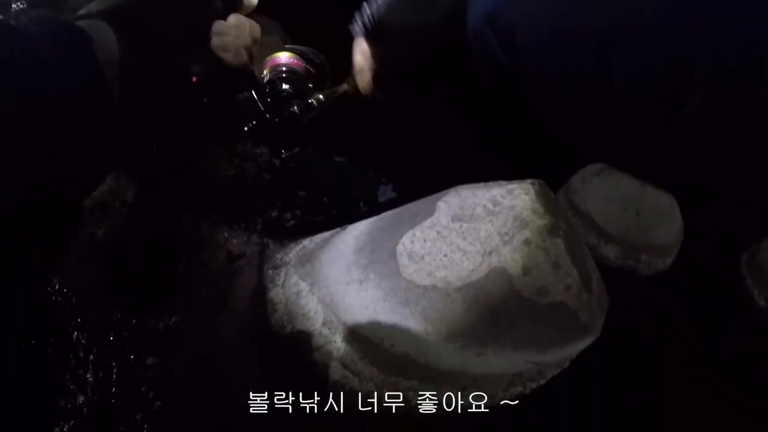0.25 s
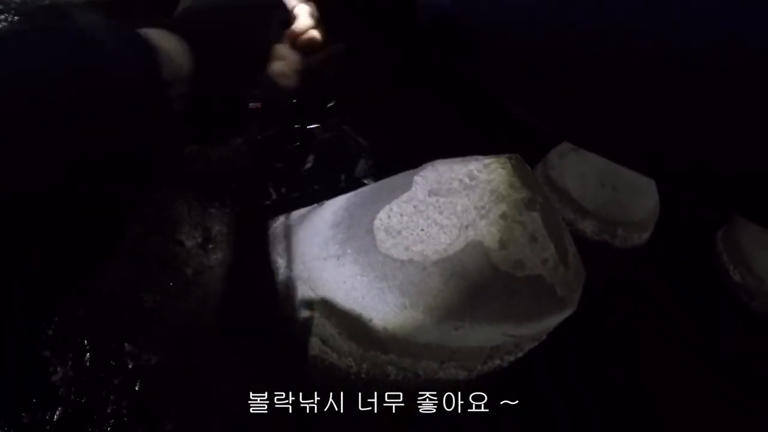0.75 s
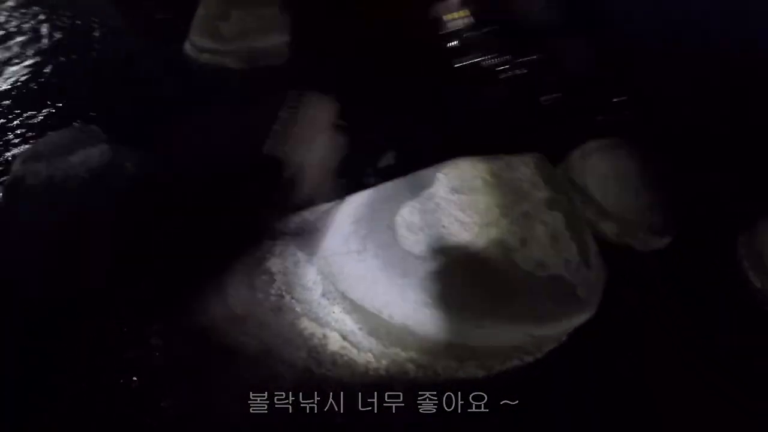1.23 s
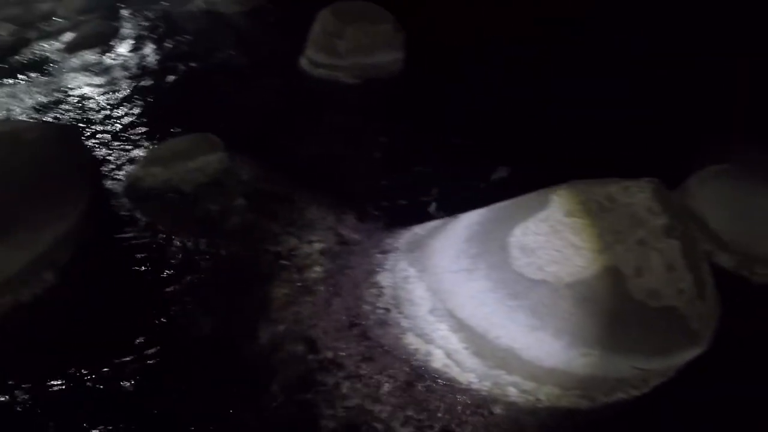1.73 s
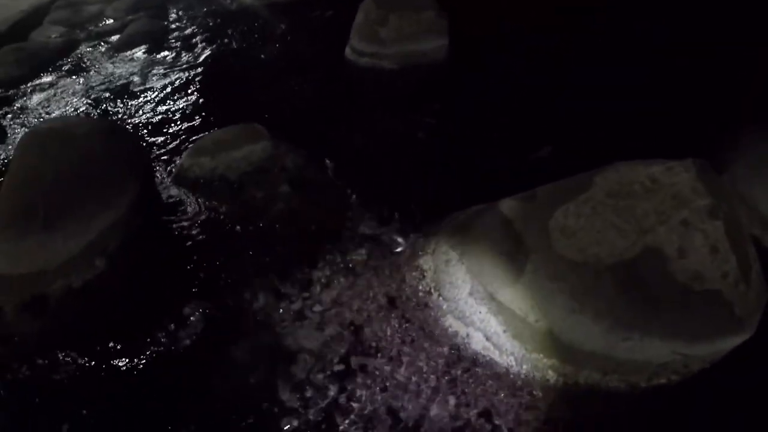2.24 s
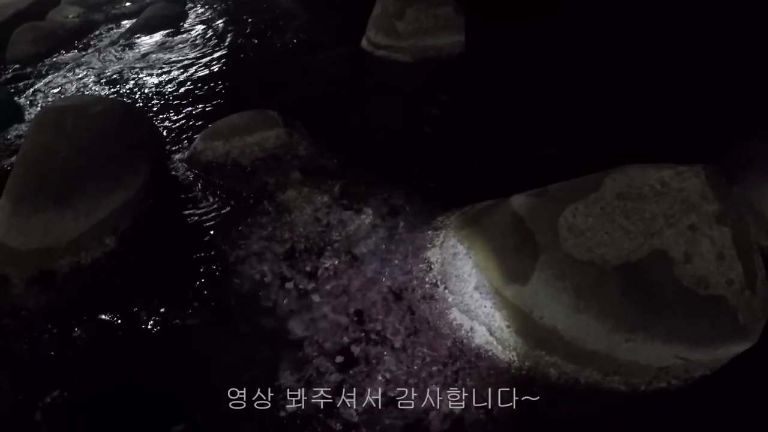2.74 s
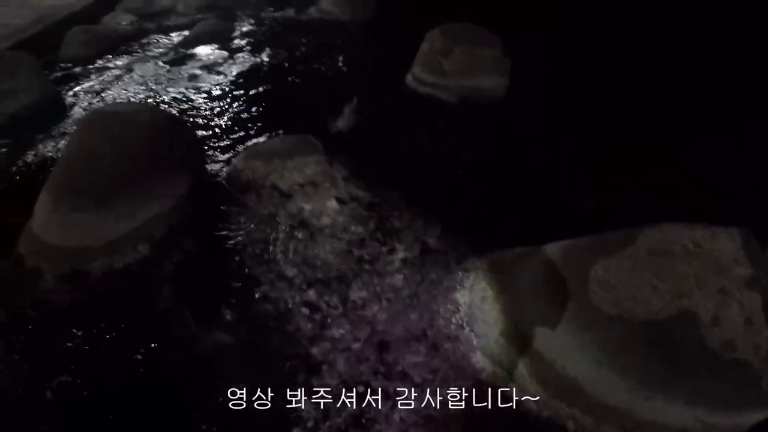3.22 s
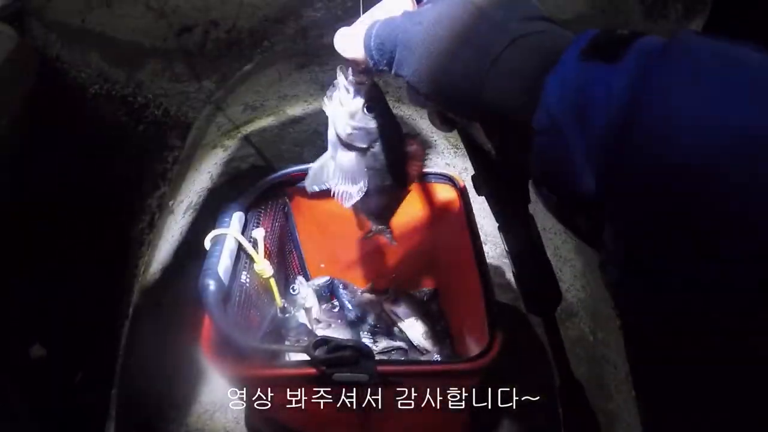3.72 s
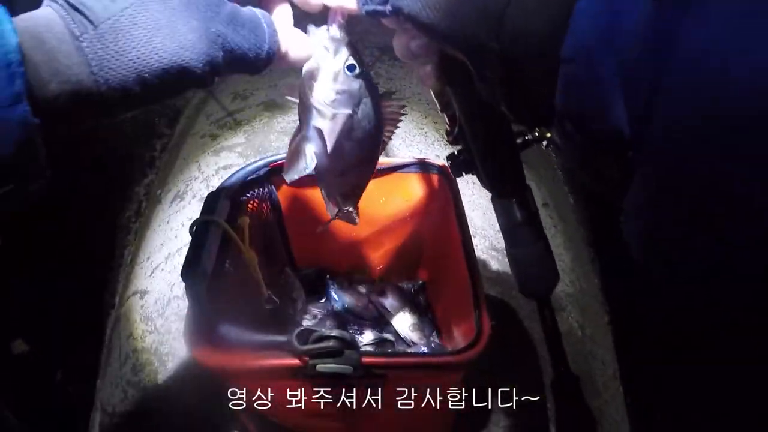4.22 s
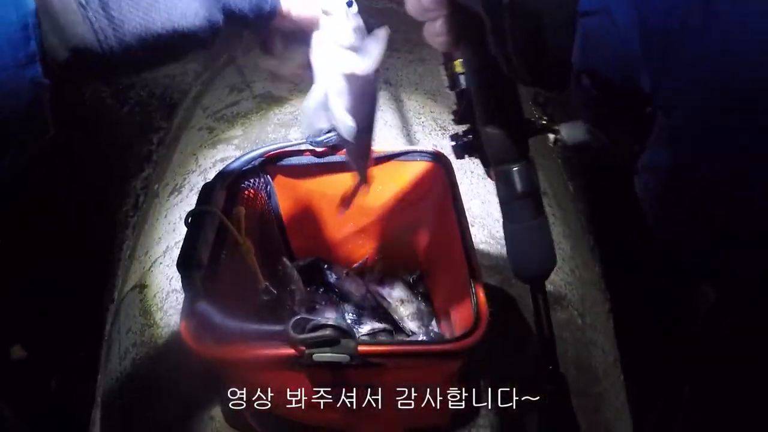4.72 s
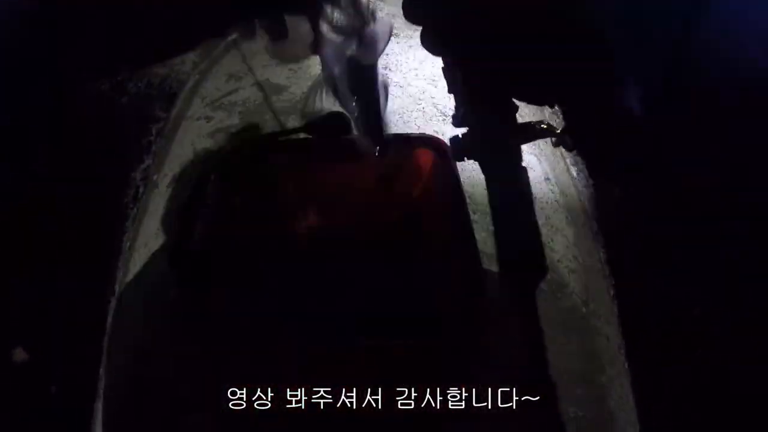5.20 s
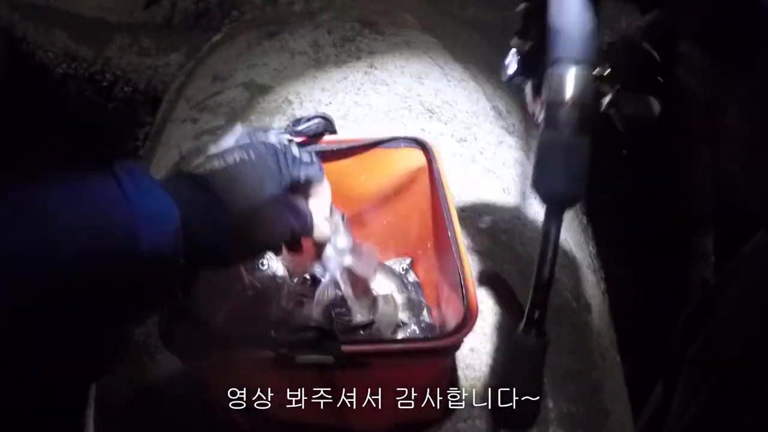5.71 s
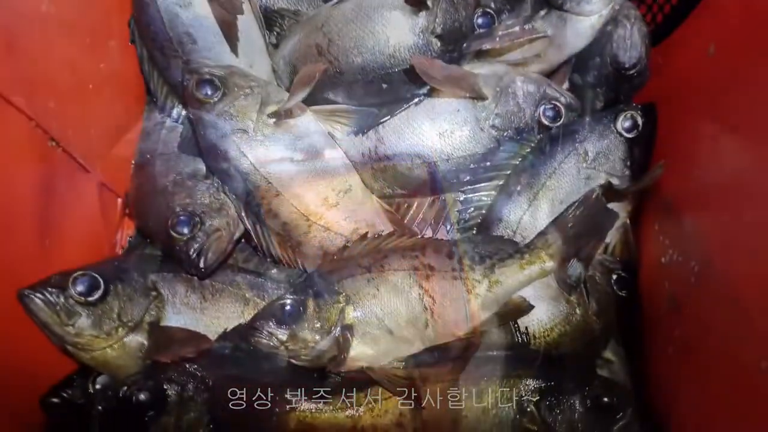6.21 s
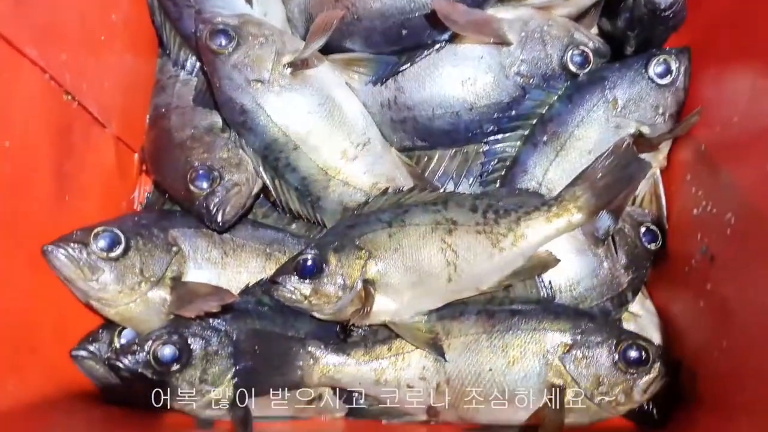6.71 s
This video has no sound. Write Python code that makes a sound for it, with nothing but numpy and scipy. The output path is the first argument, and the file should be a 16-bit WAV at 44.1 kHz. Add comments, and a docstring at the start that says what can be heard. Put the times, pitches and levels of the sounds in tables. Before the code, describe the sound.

Gear snaps and cloth rustle, wind swirls over hissing sea between rocks, then roars and overloads; brief silence, light breeze and dull bumps.

```python
"""A windy rocky shore at night, heard through the two microphone ports of a small camera, in three shots. First
shot: gear snaps and a rustle fades away, then wind swirls over the ports with its bass filtered off. Sea hisses
between the rocks, bubbles pop, a fishing reel ticks, water begins to trickle and the camera chirps faintly.
After a hard cut the wind roars in full and trips the limiter, water trickles and hard gear knocks. A silent
gap, then a calm spot: light breeze, rustling, dry snaps and bumps on the right port. Air is noise and gliding
tones; hard things are ringing modes."""
import sys
import numpy as np
from scipy import signal
from scipy.fft import rfft, irfft, next_fast_len
from scipy.io import wavfile

SR = 44100
rng = np.random.default_rng(int(sys.argv[2]) if len(sys.argv) > 2 else 0)


def materialize(psi):
    """Save the field psi as 16-bit PCM at rate SR to the path in sys.argv[1].

    A 1-D psi becomes a single channel; in a 2-D psi each row is a channel.
    """
    bounded = np.clip(np.atleast_2d(psi).T, -1, 1)
    quanta = np.round(bounded * 32767).astype(np.int16)
    wavfile.write(sys.argv[1], SR, quanta)


N = 306495

CUT_S, STOP_S, RESUME_S = 3.5355, 5.8716, 5.9495   # second shot starts, silent gap starts, calm spot starts
HZ = np.maximum(np.fft.rfftfreq(next_fast_len(N), 1 / SR), 1)   # frequency of each spectrum bin

# Levels are those ahead of the limiter; spectra are relative, as each noise is scaled to its own level.
# Light breeze at the ports in the calm spot. Each row: frequency in Hz, relative level in dB per Hz.
BREEZE_SPECTRUM = [(12, -25), (25, -9.5), (75, -0.5), (140, -11), (300, -20), (900, -27), (2000, -28.5),
                   (3000, -38.5), (6000, -65)]
BREEZE_DB = -47.5

# A rustle at the start that fades away. Each row: time in seconds, level in dB.
OPENING_RUSTLE_LEVEL = [(0, -54), (.3, -51), (.6, -78)]
# Colour of that rustle. Each row: frequency in Hz, relative level in dB per Hz.
OPENING_RUSTLE_SPECTRUM = [(700, -25.5), (1500, -21.5), (4000, 2), (6200, -4), (7200, -32.5), (15000, -24)]
# Colour of the later cloth. Each row: frequency in Hz, relative level in dB per Hz.
CLOTH_SPECTRUM = [(900, 0.5), (2000, -5), (4000, 0.5), (7400, -10.5), (13300, -12.5), (15000, -16.5),
                  (16000, -49)]
# Strokes of cloth. Each row: time of the peak in seconds, level in dB.
CLOTH_STROKES = [(4.685, -67), (6.099, -54.5), (6.37, -57.5)]
CALM_FLOOR_DB, STROKE_RISE_DB_PER_S, STROKE_FALL_DB_PER_S = -68.5, 79, 115

# Sea between the rocks, first and second shot. Each row: frequency in Hz, relative level in dB per Hz.
SEA_SPECTRA = [
    [(880, -6), (1500, -0.5), (2550, -8), (3400, -6.5), (5000, -13), (6060, -5.5), (8750, -13),
     (10000, -15.5), (12700, -23.5), (15000, -87)],
    [(880, -1), (1500, -8), (2210, -12), (2730, -14), (3860, -16.5), (4500, -24.5), (5950, -11.5),
     (8410, -19.5), (10000, -22.5), (13500, -34), (15000, -67)],
]
# How alike the sea is at both ports. Each row: frequency in Hz, left-right likeness from -1 to 1.
SEA_LIKENESS = [(1500, 0.57), (3800, 0.58), (5000, 0.29), (6500, -0.37), (10000, -0.16), (12000, 0.018)]
# Level of the sea: slow swells and short dips, before a small lift at each port. Each row: time in seconds,
# level in dB.
SURF_LEVEL = [(0, -47.5), (.55, -51.5), (1.35, -46.5), (1.85, -47.5), (4.0, -48), (4.2, -51.5),
              (4.57, -47.5), (4.6, -56), (4.685, -45.5), (4.71, -49.5), (5.15, -51.5), (5.4, -46),
              (5.55, -53.5), (5.86, -46.5)]
# Patches of trickling between the stones. Each row: start in seconds, end in seconds, base level in dB.
TRICKLE_PATCHES = [(2.597, 3.95, -61.5), (4.85, 5.852, -63)]
TRICKLE_HZ = 3364
# Bubbles popping in the wash. Each row: start in seconds, peak level in dB, pitch in Hz.
BUBBLE_POPS = [(0.757, -35, 1010), (1.539, -34, 1680), (2.554, -21.5, 890), (2.633, -33, 1880),
               (4.459, -34, 1830), (5.846, -37, 1905), (5.858, -40, 2950)]
POP_CYCLES, POP_RISE_OCTAVES = 18, 0.061

# Camera chirp, before its tilt to the right. Each row: pitch in Hz, mean peak level in dB.
CHIRP_TONES = [(9850, -57), (11300, -72)]
CHIRP_FIRST_S, CHIRP_PER_S = .0105, 30

# Dry snaps of gear and cloth. Each row: start in seconds, peak level in dB, centre of the band in Hz.
DRY_SNAPS = [(0.0298, -27, 6500), (0.083, -24.5, 1600), (0.0897, -23.5, 2500), (0.094, -26.5, 5450),
             (0.267, -33, 5340), (0.398, -33, 6500), (0.46, -31.5, 3130), (0.951, -32, 3860),
             (6.361, -43, 1700), (6.384, -36, 3370), (6.463, -33.5, 3200)]
SNAP_OCTAVES, SNAP_T60_S = 0.94, 0.016
# Knocks of hard gear. Each row: time in seconds, strength in dB.
GEAR_KNOCKS = [(5.411, -38.5), (5.4676, -35), (5.602, -24)]
# Modes of the gear. Each row: pitch in Hz, relative level in dB, 60 dB decay time in seconds.
GEAR_MODES = [(1140, -2.5, 0.017), (4700, -16, 0.006), (2230, 4, 0.01), (3200, -1.5, 0.01),
              (3910, -7.5, 0.018), (6500, -9.5, 0.0064)]
# Ticks of the fishing reel. Each row: time in seconds, strength in dB, brightness in dB per octave.
REEL_TICKS = [(1.744, -19.5, 13), (2.566, -16, 4), (2.802, -17.5, 17), (3.085, -16, 13), (3.453, -22, 20)]
# Modes of the reel. Each row: pitch in Hz, relative level in dB, 60 dB decay time in seconds.
REEL_MODES = [(4290, -13, .065), (5600, 0, .01), (6300, -5, .006), (7100, -7, .007), (8000, -9, .006),
              (9600, -12, .007), (11500, -22, .006), (14500, -36, .004)]

# Bumps on the right port. Each row: start in seconds, knock peak in dB, thud peak in dB.
PORT_BUMPS = [(6.177, -36, -26), (6.628, -14.5, -23), (6.634, -18.5, -12.5), (6.664, -26, -23),
              (6.7, -18.5, -9.5), (6.713, -14, -16), (6.758, -21.5, -25.5)]
KNOCK_HZ, KNOCK_S, THUD_HZ, THUD_S, BUMP_SAG_OCTAVES = 210, 0.01, 96, 0.049, 0.91
SCUFF_HZ, SCUFF_T60_S, SCUFF_DB = 530, 0.068, -11.5   # dull scuff trailing each knock; dB against the knock

# Wind on the ports, before gusts. Each row: time in seconds, roar in dB, whirl in dB.
WIND_LEVEL = [(0.0, -50, -40), (0.21, -42.5, -32), (0.8, -41, -26), (1.4, -40, -22), (3.28, -27, -22),
              (3.54, -25.5, -20), (3.57, -24, -27), (3.92, -27.5, -25), (4.3, -13.5, -22),
              (4.8, -15.5, -22.5), (5.4, -20, -19.5), (5.86, -23.5, -22.5)]
# Deep rumble before gusts, low until the first cut. Each row: time in seconds, level in dB.
RUMBLE_LEVEL = [(0, -41.5), (.5, -54.5), (2.9, -63.5), (3.3, -44.5), (3.53, -48), (3.54, -17), (4.5, -18.5),
                (5.86, -21)]
# The wind's top, above 1 kHz, before gusts. Each row: time in seconds, level in dB.
WIND_TOP_LEVEL = [(.2, -56), (.42, -72), (.9, -47.5), (2.2, -36), (3.5, -42.5), (4.2, -41), (5.86, -40)]
# Wind at the right port. Each row: frequency in Hz, relative level in dB per Hz.
WIND_SPECTRUM = [(12, -35), (20, 3.5), (131, 0.5), (204, -1.5), (367, -9), (487, -8), (584, -11),
                 (729, -12.5), (967, -17.5), (1450, -29.5), (2210, -38.5), (3600, -92)]
# Left port against the right; two paths cancel near 700 Hz. Each row: frequency in Hz, gain in dB.
LEFT_PORT_GAIN = [(40, -1.4), (300, -3.2), (430, -5.5), (560, -10), (690, -18), (800, -11.5), (950, -5.8),
                  (1500, -2)]
# Left port ahead of the right. Each row: frequency in Hz, phase lead in radians.
LEFT_PORT_LEAD = [(40, 0), (500, -.18), (610, 0), (690, .75), (780, 1.75), (1200, 1.95), (2200, 1.2)]
# Strongest swirls. Each row: start in seconds, peak level in dB, starting pitch in Hz, length in seconds.
STRONG_SWIRLS = [(0.906, -14, 404, 0.07), (1.043, -16, 677, 0.029), (1.529, -9, 455, 0.0037),
                 (2.256, -11, 342, 0.012), (2.542, -16, 530, 0.021), (4.303, -12, 276, 0.045),
                 (4.17, -5, 328, 0.0092), (4.327, -10, 228.5, 0.045), (4.515, -2.5, 381, 0.0084),
                 (4.58, 2, 226, 0.0066), (4.691, -1.5, 314, 0.015), (4.775, -4.5, 307, 0.0064),
                 (4.865, -13, 248.4, 0.051), (5.013, -11.5, 165, 0.075), (5.046, -8, 453, 0.039),
                 (5.078, -8, 322, 0.023), (5.19, -1.5, 223, 0.01), (5.403, -14, 303, 0.084),
                 (5.461, -3, 253, 0.062), (5.564, -8, 236, 0.015), (5.606, -11, 401, 0.025),
                 (5.624, -20.5, 293.5, 0.053), (5.334, -22, 303, 0.05), (5.025, -5.5, 171, 0.01)]
SWIRL_END_HZ = 779   # every swirl glides towards this pitch, by 1.6 octaves at most
# Buffets at a steady pitch. Each row: start in seconds, peak level in dB, pitch in Hz.
STEADY_BUFFETS = [(1.99, -17, 161), (2.421, -18.5, 152), (4.096, -4.5, 217), (4.11, -6.5, 422),
                  (4.303, -6, 188), (4.469, -5.5, 109.4), (4.832, -9, 587), (4.955, -8.5, 550),
                  (5.118, -10, 153), (5.76, -9, 483), (5.815, -13.5, 210)]
BUFFET_CYCLES = 9.4

LIMIT_DB, LIMIT_SHARE, RECOVER_DB_PER_S, LIMIT_ATTACK_S = -5.5, 0.55, 72, 0.0031
CUTOFF_HZ = 16300


def from_db(db):
    """Gain of a level in dB."""
    return 10 ** (np.asarray(db) / 20)


def rms_one(x):
    """Scaled to rms 1."""
    return x / np.sqrt(np.mean(x ** 2) + 1e-20)


def in_time(rows):
    """Each column of a level table, sample by sample."""
    s, *columns = np.transpose(rows)
    return [np.interp(np.arange(N) / SR, s, c) for c in columns]


def at_hz(points, hz):
    """A spectrum table read on a log frequency axis."""
    table_hz, value = np.array(points).T
    return np.interp(np.log(hz), np.log(table_hz), value)


def shaped(x, response):
    """Filtered by a response given at HZ."""
    size = next_fast_len(N)
    return irfft(rfft(x, size) * response, size)[..., :N]


def drift(rate_hz):
    """Slow random wandering of spread 1: noise through two one-pole smoothers, at a fortieth of SR."""
    r = np.exp(-80 * np.pi * rate_hz / SR)
    noise = rng.standard_normal(N // 40 + 2002)
    slow = signal.lfilter([1], [1, -2 * r, r * r], noise)[2000:]
    return np.interp(np.arange(N) / 40, np.arange(len(slow)), rms_one(slow))


def glides(rows, turns):
    """Short tones under a smooth hump; each row: start s, peak dB, Hz, octaves slid, length s."""
    out = np.zeros(N + SR)
    for (s, level_db, hz, octaves, length_s), turn in zip(rows, turns):
        u = np.linspace(0, 1, int(np.clip(length_s, .002, .2) * SR))
        pitch = hz * 2 ** (min(octaves, 1.6) * u)
        phase = 2 * np.pi * (turn + np.cumsum(pitch) / SR)
        out[round(s * SR):][:len(u)] += from_db(level_db) * np.sin(np.pi * u) ** 2 * np.sin(phase)
    return out[:N]


def ringing(hz, t60_s, clicks):
    """One mode of a struck body: a decaying sine started by each click."""
    r, w = from_db(-60 / (t60_s * SR)), 2 * np.pi * hz / SR
    return signal.lfilter([0, np.sin(w)], [1, -2 * r * np.cos(w), r * r], clicks)


def hiss(spectrum, alike, patchy_db, spray_per_s, spray_db):
    """Stereo noise in flickering half-octave bands with sparse spits through it; mono sum at rms 1."""
    out, together = 0, drift(11.0)
    falls = rng.random((2, N)) < spray_per_s / SR
    spits = falls * rng.standard_normal((2, N)) * from_db(spray_db)
    noise = rng.standard_normal((2, N)) + spits
    spec = rfft(noise, next_fast_len(N)) * from_db(at_hz(spectrum, HZ))
    like = np.clip(alike, -.95, .95)
    # a shared part, and a part of opposite sign at the two ports
    spec = np.sqrt(1 + like) * spec[0] + np.sqrt(1 - like) * spec[1] * [[1], [-1]]
    for octave in np.arange(9, 14.5, .5):
        band = np.clip(1 - np.abs(np.log2(HZ) - octave) / .5, 0, 1)
        flicker = from_db(patchy_db * (together + drift(9.6)))
        out = out + irfft(spec * band, next_fast_len(N))[:, :N] * flicker
    return out / np.std(out.mean(axis=0))


def breeze():
    """Light air over the ports: lumpy noise, mostly its own at each port."""
    air = rms_one(shaped(rng.standard_normal((2, N)), from_db(at_hz(BREEZE_SPECTRUM, HZ))))
    deep = shaped(air, 1 / (1 + (HZ / 300) ** 4))
    air = air + deep * (from_db(1.7 * drift(15.0)) - 1)   # the bass is lumpier
    return (air + 0.2 * air[::-1]) * from_db(BREEZE_DB + 1.8 * drift(3.5))


def rustle(spectrum, level_db):
    """Rustling, nearer the right port: coloured noise with frequent small spits."""
    cloth_noise = hiss(spectrum, 0, patchy_db=1.2, spray_per_s=150., spray_db=14.)
    return cloth_noise * from_db(level_db + [[-2], [2]])


def cloth():
    """Cloth strokes that swell and fade at steady dB rates; a faint steady rustle in the calm spot."""
    t = np.arange(N) / SR
    cloth_db = np.where(t < RESUME_S, -np.inf, CALM_FLOOR_DB)
    for s, level_db in CLOTH_STROKES:
        slope = np.where(t < s, STROKE_RISE_DB_PER_S, STROKE_FALL_DB_PER_S)
        cloth_db = np.maximum(cloth_db, level_db - slope * np.abs(t - s))
    return rustle(CLOTH_SPECTRUM, cloth_db)


def droplets(count):
    """Small bubbles bursting in the wash: brief rising pips, each at one port, most at the right; rms 1."""
    when, pitch, size, side, turn = rng.random((count, 5)).T
    hz = 1600 * 2 ** (2.2 * pitch)
    level_db = -3 * np.log(np.maximum(size, .03)) - 4 * pitch
    rows = np.c_[when * STOP_S, level_db, hz, .15 + 0 * hz, 22 / hz]
    at_right = side < .7
    return rms_one(np.array([glides(rows[at_right == k], turn[at_right == k]) for k in (0, 1)]))


def sea():
    """Wash between the rocks: flickering hiss, coloured anew at the cut, with bursting droplets in it."""
    first, second = (hiss(spectrum, at_hz(SEA_LIKENESS, HZ), patchy_db=1.5, spray_per_s=120.0, spray_db=20.0)
                     for spectrum in SEA_SPECTRA)
    wash = np.where(np.arange(N) / SR < CUT_S, first, second)
    wash = wash + from_db(-12.0) * droplets(count=1200)
    return wash * from_db(in_time(SURF_LEVEL)[0] + [[1.2], [2.2]])


def trickle(count):
    """Water running off between stones: droplets of many sizes but nearly one pitch, so pips of varied loudness
    and nearly one pitch."""
    when, pitch, size, turn = rng.random((count, 4)).T
    start, end, base_db = np.array(TRICKLE_PATCHES)[np.arange(count) % len(TRICKLE_PATCHES)].T
    hz = TRICKLE_HZ * 2 ** (.25 * (pitch - .5))
    level_db = base_db - 3.5 * np.log(np.maximum(size, .03))
    return glides(np.c_[start + when * (end - start), level_db, hz, 0 * hz + .05, 30 / hz], turn)


def bubble_pops():
    """Larger bubbles popping: each a short tone that rises a little."""
    rows = [(s, level_db, hz, POP_RISE_OCTAVES, POP_CYCLES / hz) for s, level_db, hz in BUBBLE_POPS]
    return glides(rows, rng.random(len(rows)))


def camera_chirp():
    """Brief high pips from the camera at a steady rate, mostly on the right."""
    s, out = np.arange(CHIRP_FIRST_S, STOP_S - .02, 1 / CHIRP_PER_S), 0
    for hz, level_db in CHIRP_TONES:
        level_wobble, pitch_wobble, turn = rng.standard_normal((3, len(s)))
        pip_db, pip_hz = level_db + 1.5 * level_wobble, hz * (1 + .006 * pitch_wobble)
        out = out + glides(np.c_[s - .004, pip_db, pip_hz, 0 * s, 0 * s + .009], turn)
    fade_in = np.minimum(np.arange(N) / SR / 2.0, 1)   # over the first two seconds
    return out * from_db([[-3.], [3.]]) * fade_in


def snaps():
    """Gear and cloth snapping: each a dying puff of noise in a band about an octave wide."""
    out, u = np.zeros((2, N)), np.arange(1200) / SR
    for s, peak_db, hz in DRY_SNAPS:
        shared, own = rng.standard_normal(len(u)), rng.standard_normal((2, len(u)))
        puff = (shared + .5 * own) * from_db(-60 * u / SNAP_T60_S) * np.minimum(u / .0008, 1)
        edges_hz = hz * 2 ** (SNAP_OCTAVES * np.array([-.5, .5]))
        puff = signal.sosfilt(signal.butter(3, edges_hz, "band", fs=SR, output="sos"), puff)
        out[:, round(s * SR):][:, :len(u)] += from_db(peak_db) * puff / np.abs(puff).max()
    return out


def knocks():
    """Hard gear knocking: each knock strikes every mode, with a random sign."""
    out, (s, strength_db) = np.zeros(N), np.transpose(GEAR_KNOCKS)
    for hz, level_db, t60_s in GEAR_MODES:
        clicks = np.full(N, 1e-18)   # a trace of signal keeps the filter from slowing down
        clicks[np.round(s * SR).astype(int)] = from_db(strength_db + level_db) * rng.choice([-1, 1], len(s))
        out += ringing(hz, t60_s, clicks)
    return out


def reel():
    """Each tick strikes every mode, tilted by its brightness; the left port hears it two samples later."""
    out, (s, strength_db, tilt_db) = np.zeros((2, N)), np.transpose(REEL_TICKS)
    at = np.round(s * SR).astype(int) + 36
    for hz, level_db, t60_s in REEL_MODES:
        blow_db = strength_db + level_db + tilt_db * max(np.log2(hz / 5650), 0)
        clicks = np.full((2, N), 1e-18)
        clicks[0, at + 2] = from_db(blow_db + rng.normal(0, 1.5, len(at)))
        clicks[1, at] = from_db(blow_db + rng.normal(0, 1.5, len(at)))
        # a mode sends out little below its pitch
        below_off = signal.butter(6, .93 * hz, "high", fs=SR, output="sos")
        out += signal.sosfilt(below_off, ringing(hz, t60_s, clicks))
    return out


def bumps():
    """Bumps on the right port: a short knock and its noisy scuff over a longer thud, both tones sagging."""
    tones, struck = [], np.zeros(N)
    for s, knock_db, thud_db in PORT_BUMPS:
        tones.append((s, knock_db, KNOCK_HZ, -BUMP_SAG_OCTAVES, KNOCK_S))
        tones.append((s, thud_db, THUD_HZ, -BUMP_SAG_OCTAVES, THUD_S))
        struck[round(s * SR)] = from_db(knock_db + SCUFF_DB)
    decay = signal.lfilter([1], [1, -from_db(-60 / (SCUFF_T60_S * SR))], struck)
    dulling = np.sqrt(SR / 2 / SCUFF_HZ) / (1 + (HZ / SCUFF_HZ) ** 4)
    scuff = shaped(decay * rng.standard_normal(N), dulling)
    return (glides(tones, rng.random(len(tones))) + scuff) * [[0], [1]]


def eddies(count, spread_db, length_s, glide):
    """Eddies shed at random: short tones, mostly rising; small ones are higher, briefer and stronger."""
    when, pitch, size, lasting, slide, turn = rng.random((count, 6)).T
    hz = 35 * 2 ** (4.2 * pitch)
    # stronger with pitch, so that the sum is white
    level_db = 15 * np.log10(hz) - spread_db * np.log(np.maximum(size, .02))
    lasts_s = length_s * (.3 + 2 * lasting ** 2) * (300 / hz) ** .5
    return rms_one(glides(np.c_[when * STOP_S, level_db, hz, glide * (slide - .25), lasts_s], turn))


def swirls():
    """The strongest lumps of wind: swirls gliding in pitch, and buffets that hold theirs."""
    lumps = [(s, level_db, hz, np.log2(SWIRL_END_HZ / hz), length_s)
             for s, level_db, hz, length_s in STRONG_SWIRLS]
    lumps += [(s, level_db, hz, 0, BUFFET_CYCLES / hz) for s, level_db, hz in STEADY_BUFFETS]
    return glides(lumps, rng.random(len(lumps)))


def wind():
    """Eddies over smooth turbulence in four ranges; after the cut eddies stand out and gusts deepen."""
    (rumble_db,), (top_db,), (roar_db, whirl_db) = map(in_time, (RUMBLE_LEVEL, WIND_TOP_LEVEL, WIND_LEVEL))
    second = np.arange(N) / SR >= CUT_S
    smooth = from_db(np.where(second, 6.5, 11.5)) * rng.standard_normal(N)
    shed = eddies(count=3000, spread_db=-0.2, length_s=0.0276, glide=1.277)
    flow = shaped(shed + smooth, from_db(at_hz(WIND_SPECTRUM, HZ)))
    # the ranges part near 126, 330 and 1000 Hz
    low, high, top = 1 / (1 + (HZ / 126) ** 40), 1 / (1 + (330 / HZ) ** 5), 1 / (1 + (1000 / HZ) ** 8)
    gust_db = np.where(second, 1.8, .8) * drift(9.6)   # quick gusts move all ranges together
    roar = from_db(roar_db + gust_db) * rms_one(shaped(flow, 1 - low - high))
    whirl = from_db(whirl_db + gust_db) * rms_one(shaped(flow, high - top))
    whirl += from_db(top_db + gust_db + 1.9 * drift(3.6)) * rms_one(shaped(flow, top))
    right = roar + whirl + swirls()
    right = np.where(second, right, shaped(right, 1 - low))   # the bass filter works in the first shot
    right = right + from_db(rumble_db + 0.19 * gust_db) * rms_one(shaped(flow, low))
    to_left = from_db(at_hz(LEFT_PORT_GAIN, HZ)) * np.exp(1j * at_hz(LEFT_PORT_LEAD, HZ))
    left = shaped(right, to_left)
    own = rms_one(shaped(flow[::-1], high))   # turbulence at the left port alone: the flow run backwards
    return np.array([left + own * from_db(whirl_db - 22.5), right])


def cut_steps(t):
    """Offsets at the joins: a step dying away after the cut, and a brief swell up to the silent gap."""
    after_cut = from_db(-16.5) * (t >= CUT_S) * np.exp(-np.abs(t - CUT_S) / 0.0012)
    return after_cut + from_db(-16.0) * np.exp(-np.abs(t - STOP_S) / 0.0059)


def limiter(x):
    """Peaks over the limit pull both channels down; the gain climbs back steadily."""
    over_db = np.maximum(20 * np.log10(np.abs(x).max(axis=0) + 1e-9) - LIMIT_DB, 0)
    climb = RECOVER_DB_PER_S * np.arange(N) / SR
    held_db = np.maximum.accumulate(over_db + climb) - climb
    r = np.exp(-1 / (LIMIT_ATTACK_S * SR))
    return x * from_db(-np.clip(LIMIT_SHARE, 0, 1) * signal.lfilter([1 - r], [1, -r], held_db))


def scene():
    """The two windy shots, the silent gap, the calm spot."""
    t = np.arange(N) / SR
    before_gap, after_gap = t < STOP_S, t >= RESUME_S
    windy = rustle(OPENING_RUSTLE_SPECTRUM, in_time(OPENING_RUSTLE_LEVEL)[0])
    windy = windy + sea() + trickle(count=500) + bubble_pops()
    windy = windy + camera_chirp() + knocks() + reel() + wind() + cut_steps(t)
    calm = breeze() + bumps()
    return windy * before_gap + calm * after_gap + cloth() * (before_gap | after_gap) + snaps()


def record(dry):
    """Limiter, then the highest peaks rounded, then the top cut."""
    limited = limiter(dry)
    rounded = limited / (1 + (limited / .95) ** 8) ** (1 / 8)
    return signal.sosfilt(signal.cheby2(12, 70, CUTOFF_HZ, fs=SR, output="sos"), rounded)


dry = scene()
out = record(dry)
materialize(out)
```